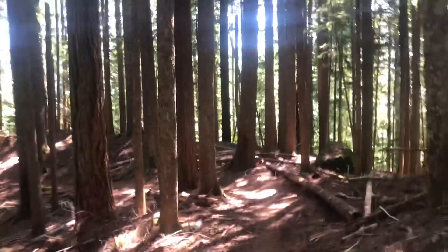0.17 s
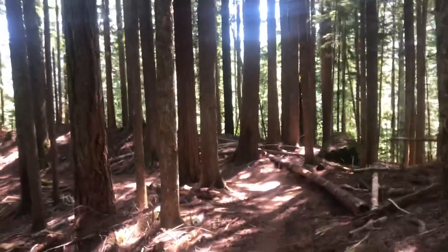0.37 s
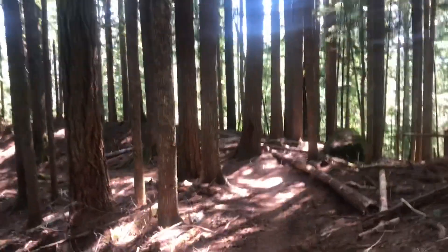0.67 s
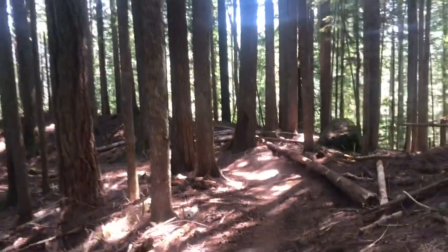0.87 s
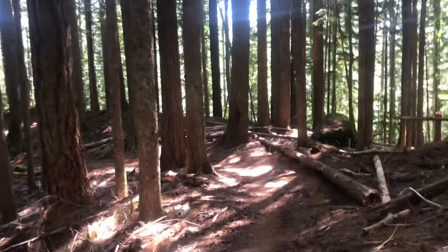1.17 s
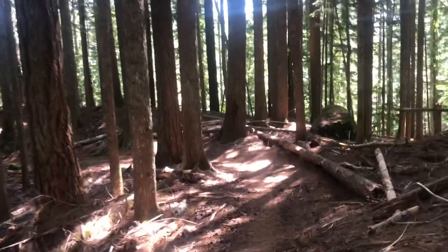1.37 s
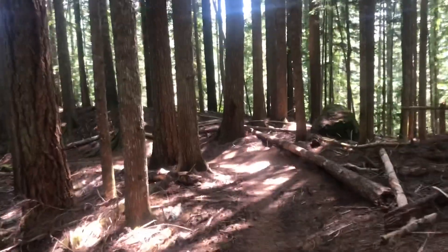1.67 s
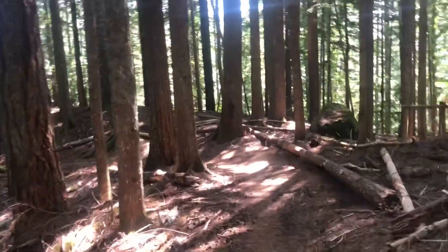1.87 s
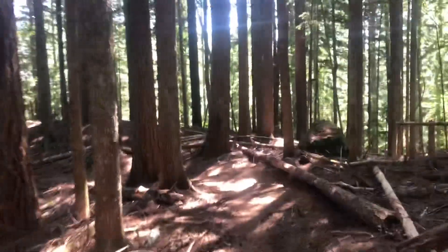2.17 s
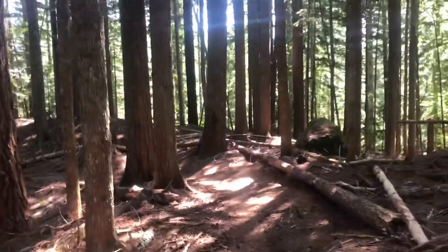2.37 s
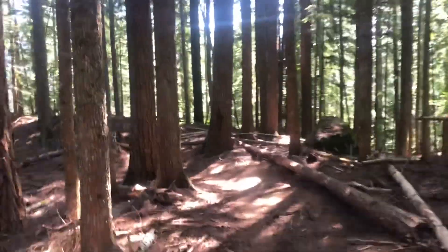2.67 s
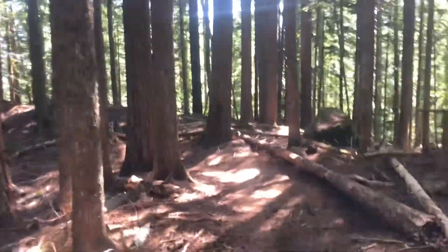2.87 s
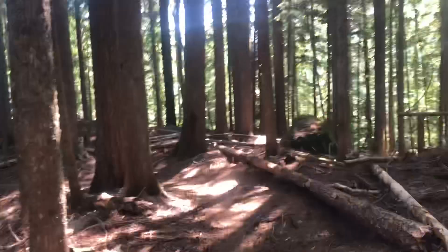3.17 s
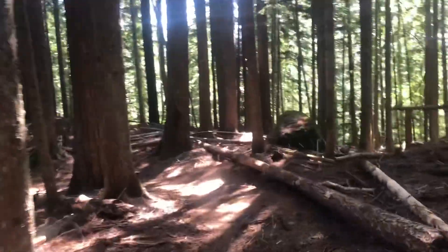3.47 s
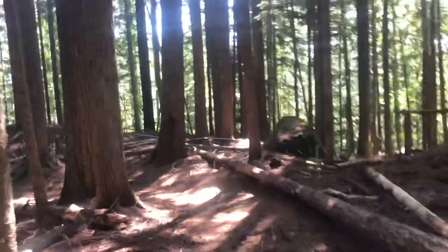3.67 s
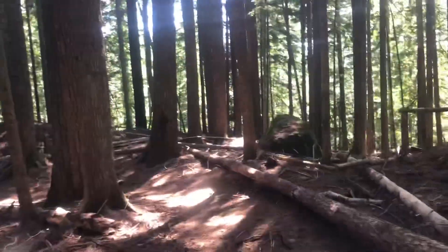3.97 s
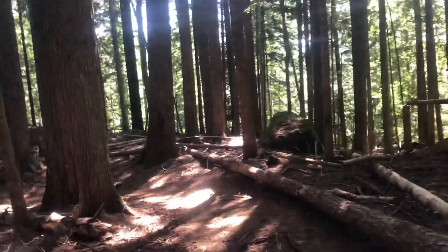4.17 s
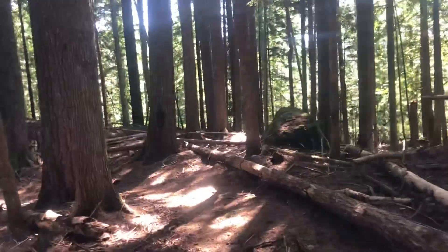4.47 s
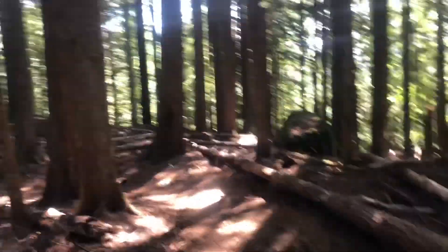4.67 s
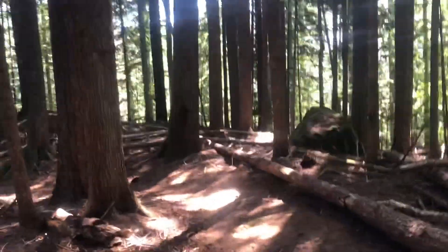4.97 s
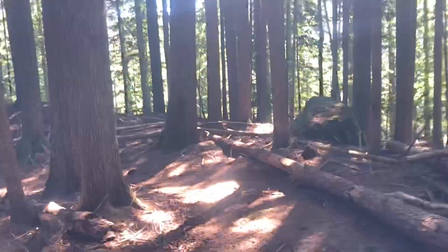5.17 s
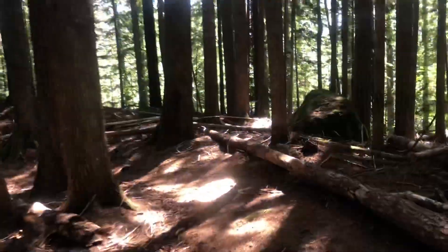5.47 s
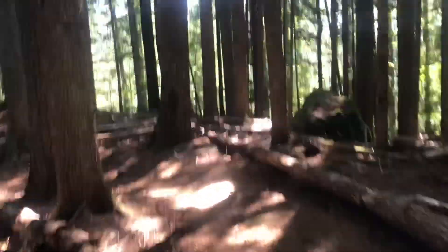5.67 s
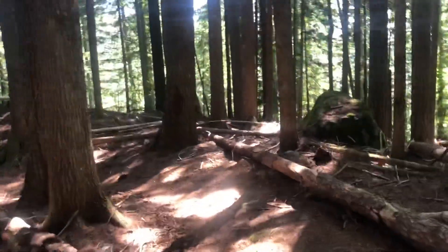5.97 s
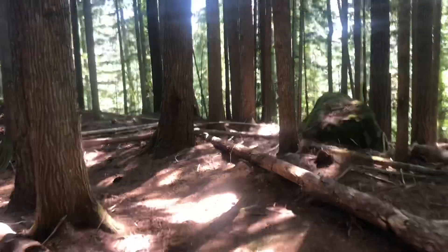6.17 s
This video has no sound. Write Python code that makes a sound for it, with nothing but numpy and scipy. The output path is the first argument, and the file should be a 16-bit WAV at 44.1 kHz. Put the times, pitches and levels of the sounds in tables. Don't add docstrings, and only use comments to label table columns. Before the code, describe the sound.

Close and rough outdoor sound: rumbling gusts come and go in short bursts, mixed with hissy, clicking scrapes of a grip on plastic. Under them a walker's soles press dry litter with small gritty crunches, dull knocks and a few twig cracks. An early low moan passes quickly; the later part alternates lulls with pops, a loud snap near five seconds, and more steps over quiet forest hiss.

```python
import sys
import numpy as np
from scipy import signal
from scipy.fft import rfft, irfft, next_fast_len
from scipy.io import wavfile
from scipy.ndimage import uniform_filter1d

SR = 44100
rng = np.random.default_rng(int(sys.argv[2]) if len(sys.argv) > 2 else 0)


def pcm_store(signal):
    levels = np.round(np.clip(np.atleast_2d(signal), -1, 1) * 32767)
    wavfile.write(sys.argv[1], SR, levels.astype(np.int16).T)


def ratio(d):
    e = np.asarray(d, float) / 20
    return 10 ** e


N = 277943
TIME = np.arange(N) / SR


def evened(x):
    return x / np.sqrt(np.mean(x ** 2) + 1e-20)


def steadied(x, seconds):
    power = abs(uniform_filter1d(x ** 2, int(seconds * SR)))
    return x / np.sqrt(power + 0.001 * np.mean(x ** 2))


def coloured(x, points):
    hz, db = np.transpose(points)
    size = next_fast_len(len(x))
    bins_hz = np.fft.rfftfreq(size, 1 / SR)
    gain = ratio(np.interp(np.log(bins_hz + 1), np.log(hz), db))
    return irfft(rfft(x, size) * gain, size)[:len(x)]


def band(x, lo_hz, hi_hz, order=2):
    return signal.sosfilt(signal.butter(order, [lo_hz, hi_hz], "bandpass", fs=SR, output="sos"), x)


def ring(x, hz, width_hz):
    pole = np.exp((-np.pi * width_hz + 2j * np.pi * hz) / SR)
    return signal.lfilter([(1 - abs(pole)) ** 2], np.poly([pole, pole]), x).real


def clicks(per_s, spread_db):
    hit, sign, size = rng.random((N, 3)).T
    level_db = spread_db * np.minimum(-np.log(size + 1e-9), 5)
    return (hit < per_s / SR) * np.sign(sign - 0.5) * ratio(level_db)


def flicker(per_s):
    size = int(SR / per_s)
    once = uniform_filter1d(rng.standard_normal(N), size)
    return evened(uniform_filter1d(once, size))


def add(mix, s, sound):
    part = mix[round(s * SR):][:len(sound)]
    part += sound[:len(part)]


def along(table):
    return np.interp(TIME, *np.transpose(table))


# (frequency [Hz], level per Hz [dB])
FOREST_SPECTRUM = [(88, -12.5), (150, -12), (194, -12.5), (293, -11), (1090, -15.5), (2010, -27),
                   (3230, -28.5), (7660, -31), (15000, -30.5), (16500, -34)]


def hush():
    swell_db = 0.6 * flicker(5)
    return ratio(-60.5 + swell_db) * evened(coloured(rng.standard_normal(N), FOREST_SPECTRUM))


# (time [s], held [ms], first level [dB], last level [dB])
STRIDE_GUSTS = [(0, 32, -46, -33.5), (0.122, 185, -29, -30), (0.419, 190, -26.5, -25), (0.72, 46, -48, -48),
                (0.862, 235, -35, -51), (1.221, 142, -46.5, -30.5), (1.4, 270, -37.5, -36.5),
                (2.005, 67, -29.5, -33), (2.12, 237, -40, -39.5), (2.441, 246, -37.5, -25.5),
                (2.821, 93, -39.5, -56), (2.99, 36, -36, -38.5), (3.1, 170, -47, -43),
                (3.299, 18, -35, -36), (3.42, 100, -46, -42.5), (3.795, 11, -36.5, -34),
                (3.88, 110, -45, -57), (4.081, 100, -44, -30.5), (4.298, 11, -38.5, -63),
                (4.4, 73, -46, -31.5), (4.541, 218, -32, -26), (4.898, 48, -27.5, -37.5),
                (5.001, 150, -34.5, -33.5), (5.402, 103, -30, -34.5), (5.5, 244, -37, -30.5),
                (5.801, 32, -32.5, -35), (6.079, 132, -51.5, -34.5), (6.25, 44, -43, -41)]


def gust_db():
    lull_db, rise_db_per_s, fall_db_per_s = -59.0, 336, 336
    out = np.full(N, lull_db)
    for s, ms, first_db, last_db in STRIDE_GUSTS:
        end = s + ms / 1000
        before_db = rise_db_per_s * np.maximum(s - TIME, 0)
        after_db = fall_db_per_s * np.maximum(TIME - end, 0)
        held_db = np.interp(TIME, [s, end], [first_db, last_db])
        out = np.maximum(out, held_db - before_db - after_db)
    return out


# (lowest [Hz], highest [Hz])
EDDY_BANDS = [(18, 85), (80, 200), (190, 330), (300, 620)]
# (level in a middling gust [dB], rise with the gust [dB per dB])
EDDY_LEVELS = [(-39, .5), (-47, 1.052), (-57, 0.6752), (-63.5, 1.2014)]
# (time [s], level [dB])
ARM_SWAY = [(0, 2.5), (.25, -2.5), (.4, 0), (.7, 2.5), (1.0, -5.5), (1.3, 1), (1.6, -5), (1.85, 11.5),
            (1.96, -4), (2.2, 1), (2.7, 3.5), (3.5, -0.5), (3.9, 4.5), (4.1, 3), (4.85, 0), (5.3, 1),
            (5.65, -2), (6.3, 3.5)]


def buffet(calm):
    above_db = gust_db() + 45
    eddies = coloured(clicks(320, 2.42), [(20, 6.5), (100, 1.0), (200, -4.5), (600, -22.5), (2000, -22)])
    left_by_size = (ratio(along(ARM_SWAY)) * calm ** 0.36, -calm, calm ** 0.067, -1)
    out = np.zeros(N)
    for (lo_hz, hi_hz), (mid_db, follow), left in zip(EDDY_BANDS, EDDY_LEVELS, left_by_size):
        level = ratio(mid_db - 6.5 + follow * above_db)
        out += left * level * steadied(band(eddies, lo_hz, hi_hz), 0.085)
    return out * ratio(1.2 * flicker(25))


# (time [s], length [ms], start level [dB], end level [dB])
GRIP_JERKS = [(0.001, 21, -40, -57), (0.11, 24.6, -36, -50), (0.293, 24, -51, -52), (0.404, 31, -46, -48),
              (0.572, 19, -39, -45), (0.845, 20, -32.5, -49), (1.025, 8, -45, -62), (1.045, 13.7, -41, -40),
              (1.31, 12, -43.5, -52), (1.349, 23, -45.5, -55), (1.625, 12, -33, -53.5),
              (1.976, 17, -45, -59), (2.124, 15.6, -32, -61), (2.138, 39, -53.5, -61),
              (2.407, 10.2, -29, -45.5), (2.504, 30, -48, -68), (2.655, 11, -29, -52),
              (2.96, 18.6, -32, -39.5), (3.434, 19.8, -38.5, -51.5), (3.513, 13.6, -33, -53),
              (4.481, 27, -37.5, -67), (4.67, 9.7, -44.5, -59), (5.07, 3.1, -44, -46),
              (5.099, 14, -40, -51), (5.139, 11, -35, -56), (5.209, 60, -39.5, -65),
              (5.282, 16.5, -40, -58), (5.522, 18, -39.5, -69), (5.629, 23, -56, -68),
              (6.206, 15.5, -29.5, -42)]
# (time [s], length [ms], start level [dB], end level [dB])
GRIP_DRAGS = [(0.021, 23.3, -47, -39), (0.045, 27, -55, -44), (0.319, 43, -54, -39),
              (0.364, 42, -41.5, -41.5), (0.447, 93, -50.5, -47), (0.915, 24, -61, -47),
              (0.941, 79, -45, -48.5), (1.034, 13, -71, -37), (1.061, 31, -42, -46),
              (1.098, 13.4, -65, -40), (1.371, 30, -52, -57), (2.416, 32, -50, -46),
              (2.448, 32.5, -54, -43.5), (2.535, 71, -56.5, -42.5), (2.608, 45, -37, -35.5),
              (3.015, 35.5, -48, -40.5), (3.085, 23.3, -34, -41.5), (3.196, 48.4, -61, -36.5),
              (3.25, 3.2, -56, -39.5), (3.643, 21, -39.5, -45.5), (4.721, 18, -50, -42),
              (4.749, 7.9, -60, -36), (4.765, 6.2, -76, -33), (5.027, 17, -32.5, -33),
              (5.081, 14, -55, -38), (5.113, 28, -35, -43), (5.154, 31.7, -46, -40.5),
              (5.191, 15, -38, -44), (5.26, 19, -51, -44), (5.661, 105, -45.5, -52.5)]
# (time [s], length [ms], peak level [dB])
GRIP_ROLLS = [(0.075, 18, -49), (0.216, 15.3, -35), (0.531, 39.7, -33.5), (0.904, 8.9, -42.5),
              (1.11, 26.5, -40.5), (1.415, 10.7, -38.5), (1.47, 59, -47), (1.514, 15.3, -41.5),
              (2.483, 20, -44), (2.678, 10.5, -32), (2.687, 13, -42), (2.99, 22, -42), (3.052, 23.4, -38),
              (3.152, 6.9, -32.5), (3.16, 13.5, -39.5), (3.184, 7.4, -49), (3.529, 16, -52.5),
              (3.602, 14.3, -46.5), (3.668, 16, -46.5), (5.544, 27, -48.5), (5.575, 21.3, -38),
              (5.604, 20, -53), (5.754, 62, -48)]


def pressure():
    force = np.zeros(N)
    for rows, bend in ((GRIP_JERKS, 1), (GRIP_DRAGS, 0.51)):
        for s, ms, start_db, end_db in rows:
            done = np.linspace(0, 1, int(ms * SR / 1000)) ** bend
            add(force, s, ratio(start_db + (end_db - start_db) * done))
    for s, ms, peak_db in GRIP_ROLLS:
        u = np.linspace(-1, 1, int(ms * SR / 1000))
        slope_db = np.where(u < 0, -12, -14)
        add(force, s, ratio(peak_db + slope_db * abs(u)))
    return force


def case(drive, modes, freed_db, spot):
    out, unit = np.zeros(N), 0
    for k, (hz, width_hz, db, share) in enumerate(modes):
        here = spot % len(modes) == k
        out += ring(drive * ratio(db + share * freed_db) * here, hz, width_hz)
        unit += ratio(2 * db) * width_hz
    return out / np.sqrt(unit / SR / len(modes))


# (frequency [Hz], width [Hz], level [dB], share of the finger lift [dB per dB])
LOW_MODES = [(4913, 820, 7, -0.45), (5400, 580, 4.5, 0.0026), (6364, 1120, -1, 0.66)]
# (frequency [Hz], width [Hz], level [dB], share of the finger lift [dB per dB])
HIGH_MODES = [(9300, 960, -10, 1), (10690, 1780, 1.5, 0.061), (12550, 1800, 9, -0.074),
              (13100, 1600, 9.5, -0.8), (15000, 1400, 11, 0.39)]
# (time [s], level [dB])
PALM_MUFFLE = [(0, -6.5), (.3, -6.5), (.36, -12), (.48, -5.5), (.57, -11.5), (1.0, -6), (1.36, -6.5),
               (1.5, -10), (2.1, -3.5), (2.45, -9.5), (3.09, -10), (3.2, -4.5), (3.6, -10.5), (4.5, -6.5),
               (5.11, -13), (5.27, -4), (5.6, -9), (6.3, -6.5)]
# (time [s], lift [dB])
FINGER_LIFT = [
    (0, -5.5),
    (.7, 2.5),
    (.85, 12),
    (1.15, 8),
    (1.3, 1),
    (2.9, 0),
    (4.5, -4.5),
    (5.1, -3.5),
    (5.7, 3.5),
    (6.3, 6.5),
]


def grip():
    slide = pressure()
    low = slide * ratio(along(PALM_MUFFLE))
    force = slide + ratio(-70) * abs(band(clicks(25, 4.0), 30, 300))
    drive = evened(clicks(20000, 1.23) * ratio(2.75 * flicker(480)))
    freed_db = along(FINGER_LIFT)
    spot = rng.integers(0, 15, N)
    scratch = case(drive * force, HIGH_MODES, freed_db, spot) + case(drive * low, LOW_MODES, freed_db, spot)
    skirt = ratio(-10.5) * band(drive * low, 500, 5900, order=1)
    return ratio(2.5) * scratch + skirt


# (time of full weight [s], spread [ms], crunch level [dB])
FOOTFALLS = [(0.036, 22, -51), (.12, 42, -57), (.22, 15, -72), (.3, 13, -54.5), (.57, 77, -69.5),
             (.85, 4, -52), (1.07, 67, -59.5), (1.27, 27, -58.5), (1.62, 38, -57), (2.0, 18, -58),
             (2.14, 33, -57), (2.22, 42, -67), (2.4, 26, -84), (2.65, 53, -59.5), (3.165, 35, -58),
             (3.23, 25, -60), (3.44, 7.5, -78), (3.67, 33, -57.5), (4.19, 32, -61.5), (4.475, 11.5, -54.5),
             (4.73, 14, -53.5), (4.85, 38, -65), (5.01, 9.3, -57), (5.064, 21, -47), (5.11, 22, -65),
             (5.26, 24, -61), (5.6, 64, -70.5), (5.766, 29, -52.5), (6.29, 37, -56)]
# (frequency [Hz], level [dB])
LITTER_SPECTRUM = [(300, -14), (700, -6), (1000, -4), (1250, 0), (1650, -6), (2400, -14), (3200, -26),
                   (16000, -44)]


def crunch():
    weight = ratio(-78.0)
    for s, ms, db in FOOTFALLS:
        weight = weight + ratio(db) * np.exp(-((TIME - s) * 1000 / ms) ** 2)
    grains = clicks(2200, 3.2) * ratio(3 * flicker(110))
    return ratio(-2.17) * weight * steadied(coloured(grains, LITTER_SPECTRUM), 0.04)


# (time [s], peak level [dB])
DULL_KNOCKS = [(0.027, -48), (0.19, -44), (0.216, -43), (0.29, -45), (0.844, -50.5), (1.044, -47.5),
               (1.067, -43), (1.123, -45), (1.309, -40.5), (1.749, -55), (1.989, -63), (2.125, -43.5),
               (2.96, -53), (3.153, -47), (3.433, -45.5), (3.646, -45), (4.464, -45), (5.411, -46),
               (5.523, -48.5), (5.706, -50), (6.207, -42)]
# (time [s], peak level [dB], frequency [Hz])
TWIG_SNAPS = [(0.118, -55, 1400), (0.348, -51, 1450), (1.649, -47, 1310), (2.405, -53, 1000),
              (2.606, -55, 920), (2.658, -51, 966), (3.183, -37, 1140), (3.667, -48, 1050),
              (5.005, -43, 1060), (5.042, -38.5, 1380), (5.065, -34.5, 1120), (5.243, -48, 1050),
              (5.749, -50, 1250), (6.257, -47, 1050), (6.272, -39.5, 975)]


def knocks_and_twigs():
    out = np.zeros(N)
    t = np.arange(500) / SR
    knock_hz = 630
    for s, peak_db, hz in TWIG_SNAPS + [(s, peak_db, knock_hz) for s, peak_db in DULL_KNOCKS]:
        cycles = t * hz * 1.7
        body = np.sin(2 * np.pi * hz * t) * cycles * np.exp(-cycles)
        burst = rng.standard_normal(500) * (t / 0.0012) * np.exp(-t / 0.0012)
        grit = band(burst, 300, 1900, order=3)
        add(out, s - 0.0005, ratio(peak_db + 13.0) * (body + 0.56 * grit))
    return out


# (time [s], peak level [dB], width [ms])
EDDY_POPS = [(0.146, -24.5, 1.28), (0.24, -24.5, 3.2), (1.368, -32.5, 1.1), (1.538, -37.5, 1.2),
             (1.629, -34, 1.1), (2.023, -27, 1.55), (2.056, -40, 1.1), (2.25, -31.5, 1.08),
             (2.71, -24.5, 1.8), (2.924, -35.5, 1.3), (3.001, -37.5, 1.1), (3.121, -35.5, 1.46),
             (3.314, -32, 1.9), (3.504, -32.5, 3.2), (3.794, -47, 1.7), (0.191, -28.5, 1.7),
             (4.165, -25.5, 2.3), (4.319, -34, 1.54), (4.474, -53, 1.3), (4.575, -27.5, 1),
             (4.648, -23, 2.2), (4.712, -30, 3.3), (5.064, -19.5, 0.9), (5.09, -33.5, 0.4),
             (5.411, -31, 1.6), (5.454, -25.5, 1.85), (5.635, -33.5, 1.4), (5.715, -33.5, 1.2),
             (5.839, -29.5, 1.46), (6.173, -30, 1.7)]


def pops():
    out = np.zeros(N)
    ms = np.arange(-15, 15, 1000 / SR)
    for s, peak_db, width_ms in EDDY_POPS:
        sign, size = rng.random(2)
        u = ms / (width_ms + 0.14 * size)
        swing = (1 - 0.8 * u ** 2 + 1.22 * u) * np.exp(-u ** 2 / 2)
        add(out, s - 0.015, ratio(peak_db) * np.sign(sign - 0.5) * swing)
    return out


# (time [s], pitch [Hz], level [dB])
VORTEX_MOAN = [
    (.39, 100.7, -49),
    (0.412, 100.7, -25.5),
    (.435, 128.3, -34),
    (0.461, 100.4, -26.5),
    (.492, 154.4, -29.5),
    (0.522, 86.4, -22),
    (0.554, 145, -26),
    (0.597, 138, -21),
    (0.629, 107.7, -33.5),
]


def moan():
    s, hz, db = np.transpose(VORTEX_MOAN)
    pitch_hz = np.interp(TIME, s, hz) * (1 + 0.04 * flicker(60))
    turn = 2 * np.pi * np.cumsum(pitch_hz) / SR
    level = uniform_filter1d(ratio(np.interp(TIME, s, db, left=-120, right=-120)), 400)
    return np.sqrt(2) * level * (np.cos(turn) + 0.081 * np.cos(2 * turn))


# (time [s], peak level [dB])
NEEDLE_TICKS = [(0.7844, -46.5), (1.201, -48), (1.2615, -49), (1.296, -47), (1.309, -35), (1.6487, -47),
                (2.372, -43), (2.512, -42), (2.8279, -37.5), (2.863, -48), (3.2296, -46), (3.3344, -64),
                (4.465, -54)]


def ticks():
    out = np.zeros(N)
    t = np.arange(500) / SR
    for s, peak_db in NEEDLE_TICKS:
        burst = rng.standard_normal(500) * (t / 0.00087) * np.exp(-t / 0.00069)
        add(out, s, ratio(peak_db + 9.0) * band(burst, 750, 4200, order=1))
    return out


def scene():
    swirl = moan()
    strength = np.sqrt(abs(uniform_filter1d(swirl ** 2, 1500)))
    calm = 1 / (1 + 60 * strength)
    air = buffet(calm) + pops() + swirl
    ground = crunch() + knocks_and_twigs() + ticks()
    return (hush() + air + grip() + ground)[None]


def roll_off(x):
    return signal.sosfilt(signal.butter(12, 16990, fs=SR, output="sos"), x)


def record(dry):
    limit = signal.firwin(401, 15900, window=("kaiser", 6), fs=SR)
    mix = signal.oaconvolve(dry, limit[None], "same")
    return roll_off(mix)


dry = scene()
out = record(dry)
pcm_store(out)
```